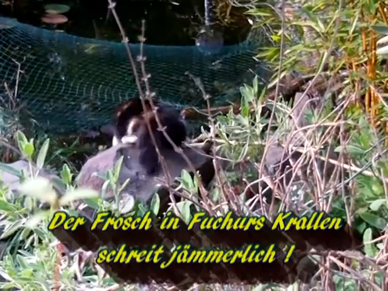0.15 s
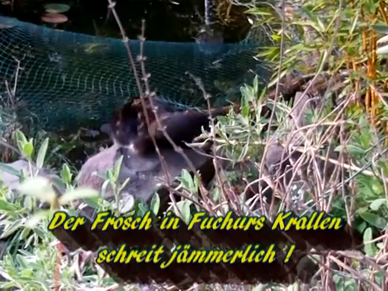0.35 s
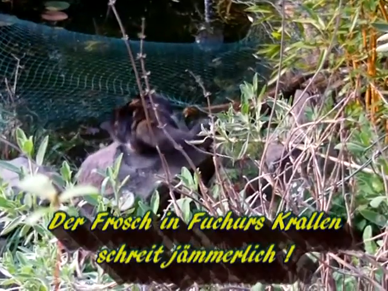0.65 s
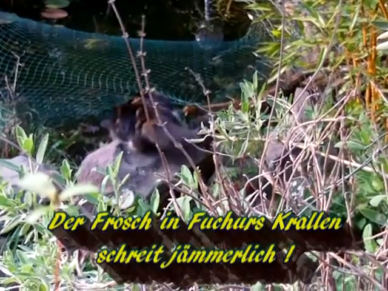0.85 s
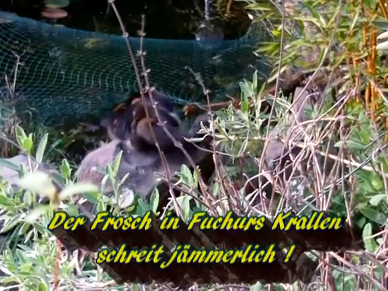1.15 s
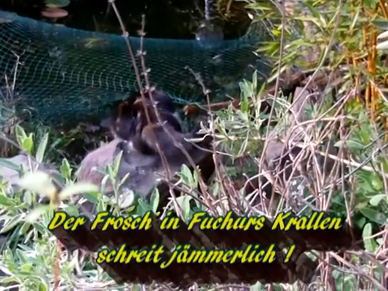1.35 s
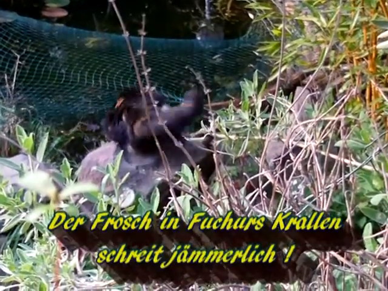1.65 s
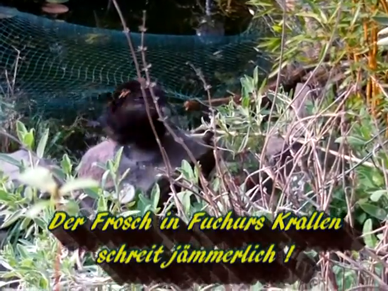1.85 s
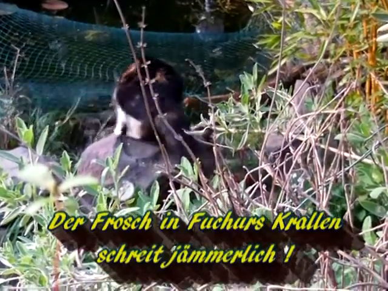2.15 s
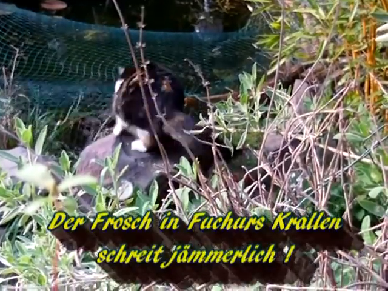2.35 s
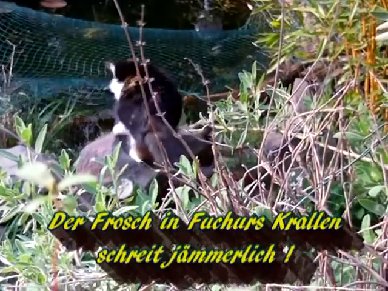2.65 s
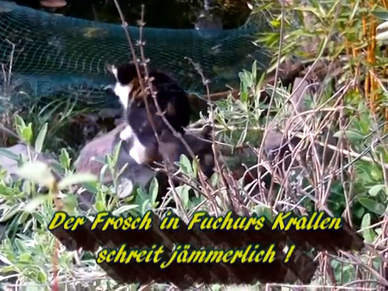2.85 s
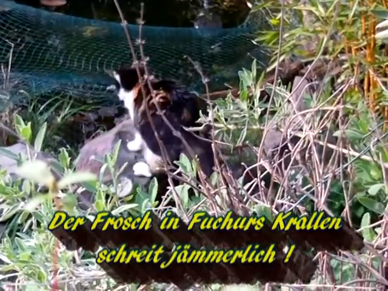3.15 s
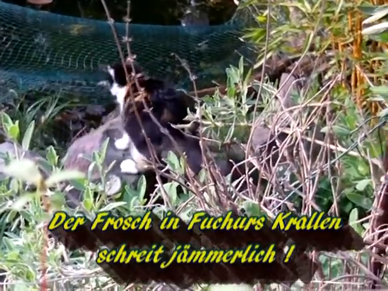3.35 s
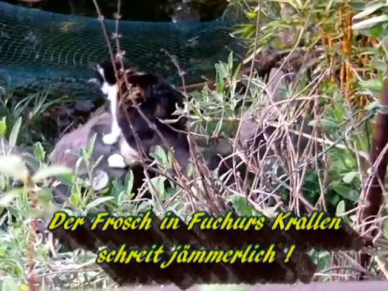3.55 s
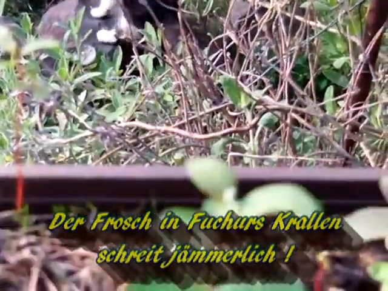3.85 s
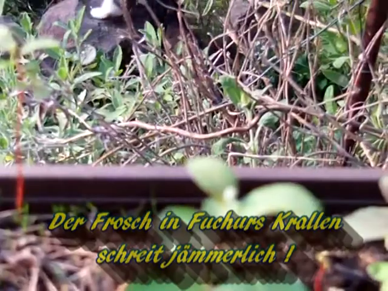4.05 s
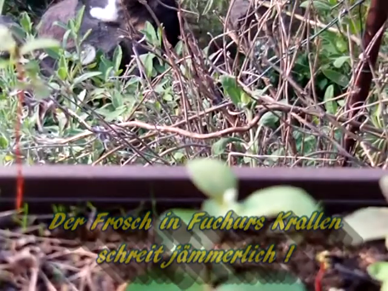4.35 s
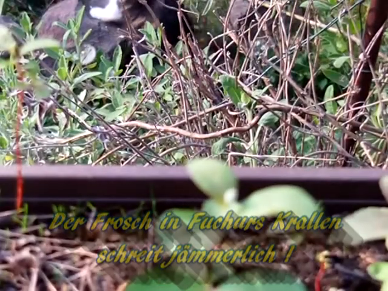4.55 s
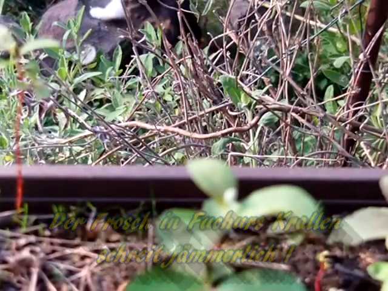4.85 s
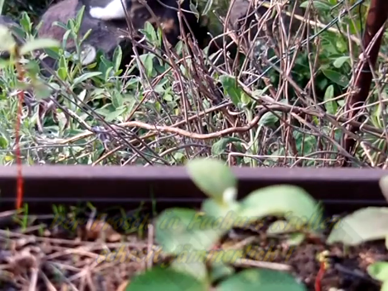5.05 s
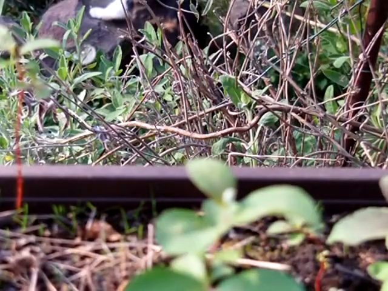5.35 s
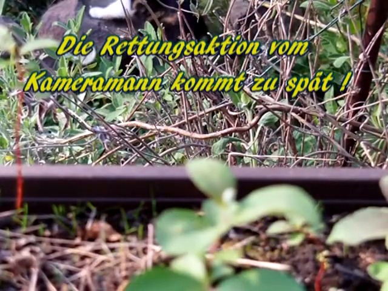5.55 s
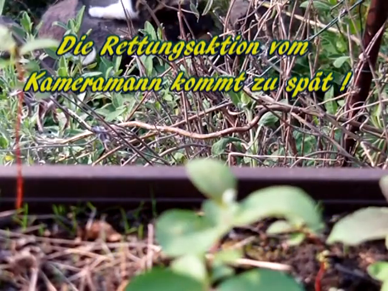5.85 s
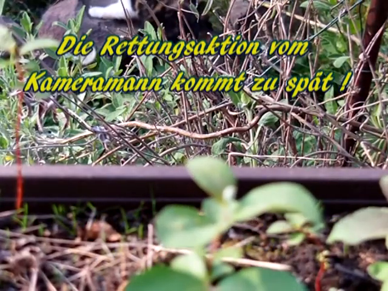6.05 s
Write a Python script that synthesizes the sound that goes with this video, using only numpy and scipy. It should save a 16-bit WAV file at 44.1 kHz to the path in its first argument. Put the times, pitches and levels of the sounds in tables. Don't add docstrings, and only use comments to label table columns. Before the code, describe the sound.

A daylight garden on a handheld camera microphone begins quietly, with far traffic hum, hiss, brushing leaves and a faint high bird from 0.4 to 1.1 s; a soft handling bump falls at 0.5. At 1.4 the gain jumps, raising the background. A near bird whistles clear slurs until about 2.8, trilling around 1.5, while a twig cracks loudly at 1.66. The frog's first harsh wail bursts out at 2.8-3.1. Leaves snap and paws thud softly near 3.2, with gentle wind. A weaker squeak-and-wail follows at 3.5-3.8. A stem breaks at 4.0, leaves brush strongly and a bird note drops at 4.2. The longest wail falls from 4.65 to 5.1, another strikes at 5.4-5.65, and the last runs from 6.0 to the end. Close gritty steps and pebble ticks begin around 4, becoming heaviest at 5.2-5.8. Short reflections from walls and shrubs surround everything.

```python
import sys
import numpy as np
from scipy import signal
from scipy.fft import rfft, irfft, next_fast_len
from scipy.io import wavfile
from scipy.ndimage import uniform_filter1d, map_coordinates

SR = 44100
rng = np.random.default_rng(int(sys.argv[2]) if len(sys.argv) > 2 else 0)


def gain_from_db(level_db):
    decades = np.asarray(level_db, float) / 20
    return 10 ** decades


def bounce(signal):
    frames = np.transpose(np.atleast_2d(signal))
    limited = np.clip(frames, -1, 1)
    pcm = np.round(limited * 32767).astype(np.int16)
    wavfile.write(sys.argv[1], SR, pcm)


N = 273420
TIME = np.arange(N) / SR


def unit(x):
    return x / np.sqrt(np.mean(x ** 2) + 1e-20)


def along(points, hz):
    f, value = np.transpose(points)
    return np.interp(np.log(hz + 1), np.log(f + 1), value)


def curves(tables):
    s, *columns = np.transpose(np.concatenate(tables))
    s = np.maximum.accumulate(s)
    return [np.interp(TIME, s, column) for column in columns]


def sounding(tables, fade):
    on = np.zeros(N)
    for rows in tables:
        start, end = rows[0][0], rows[-1][0] + fade
        on[int(start * SR):int(end * SR)] = 1
    return uniform_filter1d(on, size=max(1, int(fade * SR)))


def wobble(rate, count=N):
    knots = rng.standard_normal(int(count * rate / SR) + 4)
    return map_coordinates(knots, [np.arange(count) * rate / SR])


def filtered(x, response):
    size = next_fast_len(N + 8192)
    spectrum = rfft(x, size) * response(np.fft.rfftfreq(size, 1 / SR))
    return irfft(spectrum, size)[..., :N]


def rush(spectrum, patchy_db):
    z = signal.stft(rng.standard_normal(N + 512), nperseg=512)[2]
    patches = uniform_filter1d(rng.standard_normal(z.shape), size=6, axis=0)
    patches = unit(uniform_filter1d(patches, size=10, axis=1))
    noise = signal.istft(z * gain_from_db(patchy_db * patches), nperseg=512)[1][:N]
    return unit(filtered(noise, lambda hz: gain_from_db(along(spectrum, hz))))


def struck(times, peaks_db, t60s, rise):
    env = np.zeros(N + 2 * SR)
    for s, db, t60 in zip(times, peaks_db, t60s):
        t = np.arange(int(abs(t60) * SR) + 1) / SR
        blow = gain_from_db(db - 60 * t / abs(t60)) * (1 - np.exp(-t / rise))
        env[round(s * SR):][:len(t)] += blow
    return env[:N]


def pings(times, peaks_db, pitches_hz, t60, rise):
    out = np.zeros(N + SR)
    t = np.arange(SR // 20) / SR
    for s, db, hz in zip(times, peaks_db, pitches_hz):
        env = gain_from_db(db - 60 * t / t60) * (1 - np.exp(-t / rise))
        out[round(s * SR):][:len(t)] -= env * np.sin(2 * np.pi * hz * t)
    return out[:N]


def swells(rows):
    t = TIME[::32]
    power = 0
    for s, db, grow, die in rows:
        fall = np.where(t < s, (s - t) / abs(grow), (t - s) / abs(die))
        power = power + gain_from_db(2 * db - 138 * fall)
    return np.interp(TIME, t, np.sqrt(power))


# frequency in Hz, level in dB per Hz.
TRAFFIC_TONE = [(59, -19), (100, -6), (552, 4.5), (1400, 0), (1840, -2.5), (3120, -4), (3770, -3),
                (4860, -4.5), (8060, -8), (10400, -6), (11300, -8), (12300, -7.5), (15500, -7.5)]
# frequency in Hz, level in dB per Hz.
WIND_TONE = [(20, -1.5), (45, 1), (80, -0.5), (130, -17), (250, -31)]
# time in seconds, level in dB.
TRAFFIC_LEVEL = [
    (0, -65.5),
    (1.376, -64.5),
    (1.38, -53.5),
    (1.69, -49),
    (3.73, -49),
    (6.2, -47),
]
# peak time in seconds, level in dB.
GUSTS = [
    (.6, -85),
    (2, -68),
    (2.8, -62),
    (3.36, -60),
    (4.65, -63),
    (6.2, -65),
]
# time in seconds, level in dB, time to die 60 dB in seconds.
HAND_BUMP = (0.512, -51.5, 0.66)


def air():
    gust_s = 1.33
    breeze_db = -19.5
    traffic_db, = curves([TRAFFIC_LEVEL])
    hum = gain_from_db(traffic_db + 4) * gain_from_db(.7 * wobble(6)) * rush(TRAFFIC_TONE, patchy_db=1.7)

    gusts = swells([(s, db, gust_s, gust_s) for s, db in GUSTS])
    wind_level = gain_from_db(traffic_db + breeze_db) + gusts
    wind = wind_level * unit(gain_from_db(3.5 * wobble(9)) * rush(WIND_TONE, patchy_db=1.5))

    bump_tone = [(40, -28), (90, 2), (140, 2), (300, -17.5)]  # (Hz, dB)
    bump = struck(*np.transpose([HAND_BUMP]), rise=.042) * rush(bump_tone, patchy_db=2)
    return hum + bump + wind


# frequency in Hz, time to die 60 dB in seconds.
ECHO_DECAY = [(500, .26), (3000, .2), (8000, .17), (15000, .12)]


def walls(x):
    hz, t, z = signal.stft(rng.standard_normal(SR // 2), SR, nperseg=256)
    decay = gain_from_db(-60 * t / along(ECHO_DECAY, hz)[:, None])
    tail = signal.istft(z * decay, SR, nperseg=256)[1]
    late = np.pad(x, (260, 0))
    return signal.fftconvolve(late, tail / np.linalg.norm(tail))[:N]


# time in seconds, peak in dB, pitch in Hz, crunch in dB, grit in dB
STEPS = [(4.037, -33, 840, -3.5, -17), (4.207, -28, 310.5, -8.5, -30), (4.554, -22, 584, -13, -29),
         (4.566, -30, 557.6, -23, -31), (4.581, -26.5, 570, -14, -18), (4.851, -20.5, 520, -10.5, -30),
         (5.2, -16, 990, -9.5, -20), (5.236, -10, 470, -14.5, -33), (5.399, -10, 940, -10, -25.5),
         (5.425, -29, 970, -6.5, -21), (5.636, -27, 380, 0.5, -8.5), (5.677, -23, 387, -16, -34),
         (5.755, -18.5, 400, -12, -22), (5.814, -19.5, 960, -3.5, -6), (6.085, -25.5, 1010, -6, -30),
         (6.123, -24.5, 333, -6.5, -30.5), (6.143, -27.5, 665, -10, -30), (6.173, -26, 590, -12.5, -30),
         (4.741, -30.5, 641, -7.5, -30), (4.916, -27.5, 509, -9.5, -30), (5.697, -34, 800, -10.5, -21),
         (5.783, -34, 700, -11, -20), (6.096, -25.5, 1100, -7.5, -30)]
# frequency in Hz, level in dB per Hz.
GRAVEL_TONE = [(47, -44), (80, -4), (210, -7.5), (407, -1.5), (735, 0.5), (1200, -2.5), (1960, -13),
               (2500, -17), (3250, -52), (5500, -120)]
# frequency in Hz, level in dB per Hz.
GRIT_TONE = [(880, -65), (1500, -4), (2340, 1), (3370, 4), (4540, -1.5), (6180, -1), (15000, -23)]
# time in seconds, peak in dB, pitch in Hz.
PEBBLES = [
    (1.3867, -44, 1730),
    (3.4789, -30.5, 1503),
    (4.0212, -36, 1190),
    (4.0876, -25, 1360),
    (4.7433, -18.5, 2150),
    (4.9172, -28, 2210),
    (5.136, -30, 1570),
]


def steps():
    s, db, hz, crunch_db, grit_db = np.transpose(STEPS)
    s = s + .001536
    t60 = np.full(len(s), .22)
    knock = pings(s, db + 5, hz, t60=.014, rise=.0004)
    knock = knock + pings(s, db - 5, 2.3 * hz, t60=.008, rise=.0002)

    lumps = gain_from_db(3 * wobble(120))
    crunch = struck(s, db + crunch_db, t60, rise=.0048) * unit(lumps * rush(GRAVEL_TONE, patchy_db=2))
    grit_level = struck(s, db + grit_db - 1.5, 1.3 * t60, rise=.00026)
    grit = grit_level * unit(lumps * rush(GRIT_TONE, patchy_db=0))

    at, tick_db, tick_hz = np.transpose(PEBBLES)
    ticks = pings(at, tick_db + 7, tick_hz, t60=.0075, rise=.00019)
    ticks = ticks + pings(at, tick_db, 2.73 * tick_hz, t60=.0065, rise=.00035)
    scuffs = filtered(knock + crunch + grit, lambda f: f ** 4 / (f ** 4 + 200 ** 4))
    return scuffs + ticks


# time in seconds, peak in dB.
SHARP_CLICKS = [(5.2007, -21), (5.2368, -22.5), (5.3997, -21), (5.4265, -25), (5.6368, -27), (5.661, -20),
                (5.7562, -21), (5.815, -13), (1.661, -12), (3.9925, -22), (5.8385, -14), (4.852, -30),
                (5.1355, -32), (2.789, -32), (4.674, -30), (4.86, -33)]
# time in seconds, peak in dB, pitch in Hz.
PAW_THUDS = [(3.2, -47, 410), (3.233, -34.5, 453), (3.258, -41, 360), (3.282, -46, 320), (3.322, -44, 410),
             (3.378, -42, 240), (3.397, -42, 130), (3.476, -45, 161), (3.6, -43, 181), (1.63, -45, 191),
             (.5, -56, 280), (4.85, -38, 160), (0.005, -50, 450)]


def cracks():
    s, db = np.transpose(SHARP_CLICKS)
    clicks = struck(s, db + 4, np.full(len(s), .005), rise=.0001) * rng.standard_normal(N)
    click_tone = [(400, -19), (1500, 4), (4000, -2), (12000, -14)]  # (Hz, dB)
    clicks = filtered(clicks, lambda f: gain_from_db(along(click_tone, f)))
    at, thud_db, hz = np.transpose(PAW_THUDS)
    return clicks + pings(at, thud_db + 4.5, hz, t60=.072, rise=.0047)


# frequency in Hz, level in dB per Hz.
LEAF_TONE = [(500, -7), (1500, -11), (3500, -12), (6000, -7.5), (8300, -7), (9500, -5.5), (12000, -9),
             (15500, -15)]
# loudest time in seconds, level in dB, # seconds to grow 69 dB,
# seconds to die 69 dB (signs are ignored).
BRUSHES = [(.12, -50, 4, 1.5), (.22, -50, 2, 0.5), (.7, -56, .15, -1.5), (1.17, -49, 0.8, 2),
           (1.27, -40.5, 0.25, 0.47), (1.39, -67, -4, 1), (1.602, -40, 0, 1), (1.662, -33.5, -0.27, 0.73),
           (1.86, -43.5, 0.8, .5), (2.28, -48, 2, 2.5), (2.53, -40, -0.13, 0.1), (3.15, -51, 2, 0),
           (3.21, -40, -0.55, 0.4), (3.7, -54, 5, -2), (4.05, -50, 1.5, 3), (4.22, -29.5, .5, 0.29),
           (4.5, -49, 0.5, 5), (5.16, -41.5, -0.4, 0.2), (5.818, -43.5, 0.5, 0.4)]
# time in seconds, brushing level before it in dB.
GAIN_JUMP = (1.378, -12)
# time in seconds, peak in dB, dull part in dB relative to the peak.
SNAPS = [(0.0306, -37, -28), (0.107, -39.5, -14), (0.64, -52, -2), (1.156, -43, -15), (1.268, -53, -12),
         (1.59, -42, -16), (1.603, -26, -25), (1.6105, -30, -25), (1.616, -31, -25), (1.6608, -10, -18),
         (1.673, -26, -25), (1.691, -26, -12), (1.697, -28, -25), (5.777, -40, -20), (4.2, -30, -20),
         (1.824, -31.5, -0.5), (2.252, -39, -14), (2.5235, -23.5, -29), (2.6758, -36, -19),
         (3.2049, -18.5, -22), (3.334, -36, 0), (3.993, -20, 7), (4.0382, -30, -24), (4.6128, -20, -6.5),
         (4.6255, -40, 8), (3.945, -47, -20)]
# frequency in Hz, level in dB.
STEM_TONES = [(1300, -20), (1940, -18), (2500, 2.5), (2900, 4), (3500, 0), (4344, 1), (5100, -16),
              (6000, -11), (7300, -11.5)]
# time in seconds, level in dB.
STEM_BREAK = (3.9915, -6)


def leaves():
    crackle = gain_from_db(1.8 * wobble(150) + .7 * wobble(30))
    jump_s, before_db = GAIN_JUMP
    brush_level = gain_from_db(3.5 + before_db * (TIME < jump_s)) * swells(BRUSHES)
    brush = brush_level * unit(crackle * rush(LEAF_TONE, patchy_db=2.2))

    s, db, dull_db = np.transpose(SNAPS)
    t60 = np.full(len(s), .017)
    bright_tone = [(2500, -7), (5000, 0), (11000, 7.5), (15500, -7)]  # (Hz, dB)
    dull_tone = [(600, -20), (1400, .5), (2600, -2), (4500, -4), (8000, -48)]
    bright = struck(s, db - .5, t60, rise=.00028) * rush(bright_tone, patchy_db=4.5)
    dull = struck(s, db + dull_db, t60, rise=.000096) * rush(dull_tone, patchy_db=6)

    at, break_db = STEM_BREAK
    stem = sum(pings([at], [break_db + level], [hz], t60=.017, rise=.003) for hz, level in STEM_TONES)
    return filtered(brush + bright + dull + stem, lambda f: f ** 4 / (f ** 4 + 900 ** 4))


def slurs(rows):
    onset_db, fade_db, peak_at = -8, -6.5, .39
    legato_s = .004
    ease = .6
    s, length, *_ = np.transpose(rows)
    gaps = s[1:] - (s + length)[:-1]
    apart = np.r_[True, gaps > legato_s, True]
    u = np.linspace(0, 1, 9)
    glide = (1 - ease) * u + ease * np.sin(np.pi / 2 * u) ** 2
    notes = []
    for (at, long, low, high, db), first, last in zip(rows, apart, apart[1:]):
        swell_db = np.interp(u, [0, peak_at, 1], [onset_db * first, 0, fade_db * last])
        notes.append(np.c_[at + long * u, low + (high - low) * glide, db + swell_db])
    return notes


def whistle(notes, octave_db, bend=1, stroke=1):
    pitch, level_db = curves(notes)
    phase = 2 * np.pi * np.cumsum(pitch * bend) / SR
    gain = gain_from_db(level_db + 1.5 * wobble(70)) * stroke * sounding(notes, fade=.0011)
    return np.sqrt(2) * gain * (np.sin(phase) + gain_from_db(octave_db) * np.sin(2 * phase))


# start in seconds, length in seconds, from Hz, to Hz, level in dB.
FAR_SONG = [
    (.378, .023, 5400, 4040, -53.5),
    (.401, 0.034, 4013, 3930, -58),
    (.43, .055, 3970, 4450, -58),
    (.53, 0.029, 3170, 2624, -53),
    (.69, 0.024, 3230, 3540, -57),
    (.72, 0.065, 2120, 2230, -63),
    (.91, 0.022, 5620, 4230, -60),
    (.93, .045, 4200, 5430, -63),
    (.975, 0.044, 5350, 6000, -59.5),
    (1.025, 0.073, 5980, 3570, -57),
]
# start in seconds, length in seconds, from Hz, to Hz, level in dB.
NEAR_SONG = [(1.38, 0.046, 2870, 3330, -38.5), (1.431, 0.015, 3720, 3069, -42),
             (1.446, 0.072, 3490, 3500, -40), (1.557, 0.027, 4374, 2815, -38),
             (1.621, 0.025, 2358, 2613, -39.5), (1.645, 0.049, 2610, 2640, -41),
             (1.726, 0.034, 4560, 4380, -34.5), (1.763, 0.02, 4380, 3011, -41),
             (1.779, .047, 3011, 2770, -48), (1.917, 0.0075, 2983, 3437, -40.5),
             (1.924, .015, 3454, 2940, -40), (1.939, 0.066, 2925, 3930, -38.5),
             (2.004, 0.032, 4435, 4330, -33), (2.043, .026, 4400, 4380, -41),
             (2.111, 0.044, 4025, 4000, -34), (2.154, 0.048, 3970, 3490, -33),
             (2.328, .056, 2580, 1960, -41), (2.394, 0.072, 1959, 2195, -49),
             (2.455, 0.076, 2195, 2276, -51.5), (2.604, 0.027, 2730, 3010, -43),
             (2.622, .14, 2877, 2671, -40.5), (4.211, 0.038, 3064, 1700, -32),
             (4.436, 0.018, 4091, 4600, -41.5), (4.46, 0.043, 3720, 3620, -47.5)]
# time in seconds, pitch in Hz, level in dB.
ANSWER = [
    [(.535, 4060, -59), (.556, 4770, -60.5)],
    [(1.235, 7350, -62), (1.25, 7500, -68)],
]
# start and end in seconds, strokes per second, pitch swing as a share.
TRILL = (1.45, 1.553, 45, .05)


def birds():
    start, end, rate, swing = TRILL
    beat = ((TIME - start) * rate) % 1
    trilling = (TIME > start) & (TIME < end)
    bend = 1 + trilling * swing * (1 - 2 * beat)
    stroke = np.where(trilling, np.sin(np.pi * beat) * 1.38, 1)
    octave_db = np.where((TIME > .4) & (TIME < .5), -3, -30)
    song = whistle(slurs(FAR_SONG + NEAR_SONG), octave_db, bend, stroke)
    return song + whistle(ANSWER, -30)


# time in seconds, pitch in Hz.
WAIL_PITCH = [
    [(2.76, 1866), (2.792, 1934), (2.85, 1605), (2.87, 1380), (2.92, 1267), (2.95, 1265), (2.982, 1315),
     (2.985, 1395), (3.11, 1380)],
    [(3.634, 1654), (3.687, 1555), (3.752, 1355), (3.783, 960), (3.819, 940)],
    [(4.675, 1760), (4.71, 1490), (4.772, 1289), (4.846, 1231), (4.864, 1252), (4.9, 1170), (5.006, 1075),
     (5.05, 921), (5.084, 922)],
    [(5.497, 1500), (5.521, 1347), (5.551, 1242), (5.679, 1227)],
    [(6.048, 1520), (6.091, 1381), (6.197, 1227)],
]
# time in seconds, pitch in Hz.
SQUEAK_PITCH = [
    [(3.53, 3130), (3.552, 3000), (3.558, 2750), (3.569, 2600), (3.572, 2320), (3.597, 2170), (3.603, 2050),
     (3.632, 1900)],
    [(4.638, 3250), (4.65, 2900), (4.654, 2500), (4.656, 2130), (4.673, 1920)],
    [(5.405, 3480), (5.424, 3330), (5.436, 3350), (5.44, 2700), (5.458, 2040), (5.473, 1720), (5.495, 1690)],
    [(5.994, 3373), (6.009, 3350), (6.012, 2550), (6.03, 1960), (6.033, 1850), (6.046, 1740)],
]


def folds():
    pitch, = curves(sorted(WAIL_PITCH + SQUEAK_PITCH))
    return uniform_filter1d(pitch, size=int(.002 * SR))


# time in seconds, level in dB, mouth resonance in Hz.
EFFORT = [
    [(2.76, -44, 1920), (2.81, -29.5, 3200), (2.822, -14, 3630), (2.842, -24.5, 4000), (2.858, -10.5, 4500),
     (2.872, -21, 4420), (2.96, -18.5, 4840), (3.03, -21, 4300), (3.11, -39, 4190)],
    [(3.53, -40.5, 2640), (3.62, -26.5, 3820), (3.636, -23.5, 3480), (3.75, -31.5, 3160),
     (3.796, -34.5, 2100), (3.82, -61, 2040)],
    [(4.64, -30.5, 4160), (4.657, -24.5, 4200), (4.706, -14.5, 5640), (4.78, -16, 6100), (4.862, -20, 5500),
     (4.882, -15, 4780), (4.97, -26, 3860), (5.062, -25, 2920), (5.085, -51, 2820)],
    [(5.405, -46, 3000), (5.456, -26, 4290), (5.494, -34.5, 4000), (5.497, -15, 4500), (5.51, -13, 4300),
     (5.522, -24.5, 4330), (5.6, -23, 3960), (5.652, -20, 3660), (5.662, -44, 3660)],
    [(5.996, -25, 3500), (6.012, -31, 4800), (6.031, -36, 4000), (6.034, -26, 5400), (6.048, -24.5, 5500),
     (6.094, -15.5, 5600), (6.12, -16.5, 5550), (6.2, -21.5, 5500)],
]
# overtones above the mouth resonance at the start in dB, the same at the
# end in dB, fundamental in dB, octave in dB.
COLOUR = [
    (2, -0.5, 1, 0.5),
    (0, -11.5, -2, -0.5),
    (4.5, -10, -2.5, 4),
    (-5, -1, -0.5, 7),
    (-5.5, -2, -6, 6),
]


def mouth_shape():
    open_db_per_octave = 25
    focus_top_db, focus_low_db = -.88, -.5
    level_db, mouth = curves(EFFORT)
    colours = []
    for rows, (first, last, *lows) in zip(EFFORT, COLOUR):
        colours.append([(rows[0][0], first, *lows), (rows[-1][0], last, *lows)])
    top_db, low_db, octave_db = curves(colours)
    push_db = np.clip(level_db, -34, 0) + 22
    top_db = top_db + open_db_per_octave * np.log2(mouth / 4500) + focus_top_db * push_db
    return [level_db, mouth, top_db, low_db + focus_low_db * push_db, octave_db]


# frequency in Hz, level in dB.
THROAT = [(900, -18.5), (1400, -11.5), (2200, -2.5), (3000, -8), (3600, -0.5), (4500, 3.5), (5400, 5),
          (7000, 0), (8000, 1), (10700, -14), (12900, -10.5), (15500, -12)]
# delay in seconds, share returned.
STONE = (0.001132, 0.087)


def frog():
    shrill_hz, shrill_sag = 11500, .14
    gate = sounding(EFFORT, fade=.004)
    live = gate > 0
    pitch, *shape = (curve[live] for curve in [folds()] + mouth_shape())
    level_db, mouth, top_db, low_db, octave_db = uniform_filter1d(shape, size=SR // 600, axis=1)
    count = len(pitch)

    tight = np.clip(np.log(pitch / 1750) / .25, 0, 1)
    pitch = pitch * (1 + .004 * wobble(60, count) + .0055 * wobble(400, count))
    phase = 2 * np.pi * np.cumsum(pitch) / SR
    slack = np.clip(np.log(1150 / pitch) / .2, 0, 1)
    flutter = .11 * wobble(500, count)
    thin = np.clip(np.log(pitch / 2300) / .1, 0, 1)

    tone, power = 0, 0
    for k in range(1, 18):
        hz = k * pitch
        off = np.log(hz / mouth)
        cavity_off = np.log(hz / shrill_hz) - shrill_sag * np.log(pitch / 1500)
        shrill = np.exp(-(cavity_off / .13) ** 2)
        gain_db = along(THROAT, hz) + 14 * np.exp(-(off / .19) ** 2)
        gain_db = gain_db + top_db * np.clip(off / .55, 0, 1) * (1 - shrill)
        gain_db = gain_db + (8 - 4 * slack) * shrill
        if k == 1:
            gain_db = gain_db + low_db + 8.5 * tight
        elif k == 2:
            gain_db = gain_db + octave_db - 12 * thin
        else:
            gain_db = gain_db - 6 * thin + 2.37 * tight * (k - 2) * (.5 + shrill)
        gain_db = gain_db - 12 * tight ** 2 * np.clip(np.log(hz / 4800) / .29, 0, 1) * (1 - shrill)
        gain = gain_from_db(gain_db) * (hz < SR / 2.6)
        unsteady = gain_from_db((.7 + 2.5 * tight + .35 * k) * wobble(60, count))
        tone = tone + gain * unsteady * np.cos(k * phase + k * k + k * slack * flutter)
        power = power + gain ** 2 / 2

    breath = rush(THROAT, patchy_db=3)[live] * (1 + .7 * np.cos(phase))
    voice = np.zeros(N)
    voice[live] = gain_from_db(level_db - 2.5 - 5 * tight) * (tone / np.sqrt(power) + gain_from_db(-16) * breath)
    delay, share = STONE
    return filtered(voice * gate, lambda hz: 1 + share * np.exp(-2j * np.pi * hz * delay))


def scene():
    voice, song = frog(), birds()
    ground = leaves() + steps() + cracks()
    echo = walls(gain_from_db(-6.5) * voice + gain_from_db(-5.5) * song + gain_from_db(-19) * ground)
    return (voice + .95 * song + ground + echo + air())[None]


def top_cut(x):
    return signal.sosfilt(signal.butter(12, 16460, fs=SR, output="sos"), x)


def record(dry):
    def microphone(hz):
        dip_db = -8 * np.exp(-((hz - 7950) / 90) ** 2)
        limit_db = -60 * np.clip((hz - 15680) / 260, 0, 2)
        return gain_from_db(dip_db + limit_db)

    return top_cut(filtered(dry, microphone))


dry = scene()
out = record(dry)
bounce(out)
```